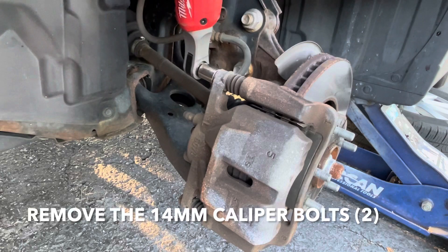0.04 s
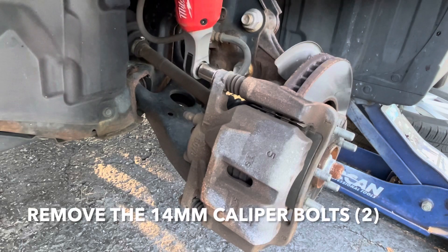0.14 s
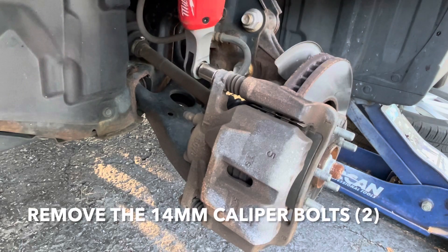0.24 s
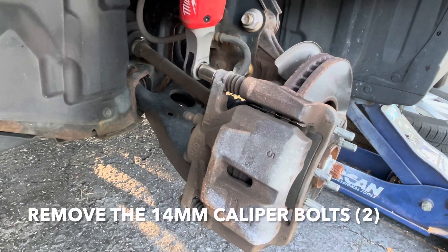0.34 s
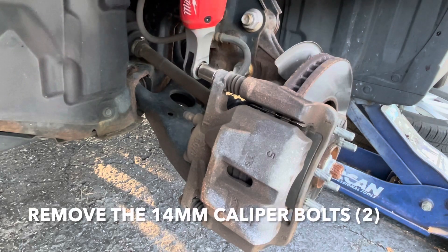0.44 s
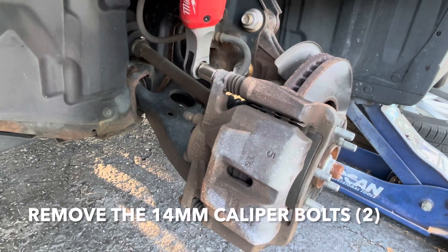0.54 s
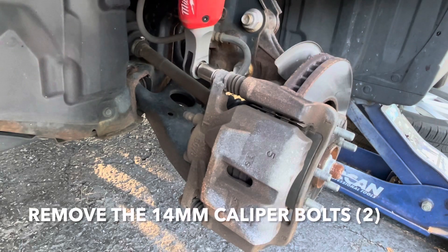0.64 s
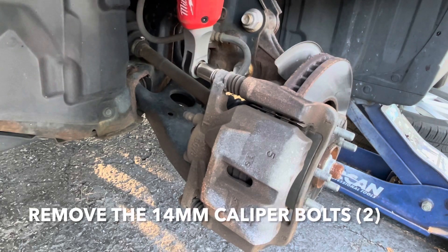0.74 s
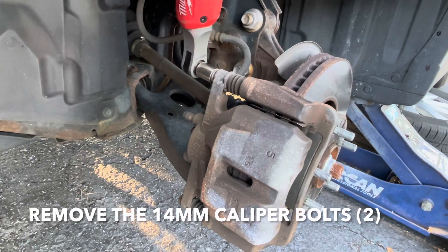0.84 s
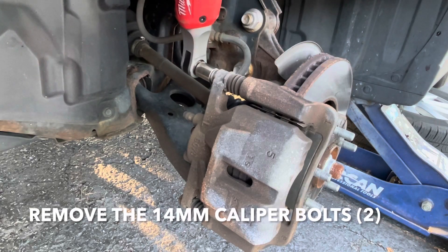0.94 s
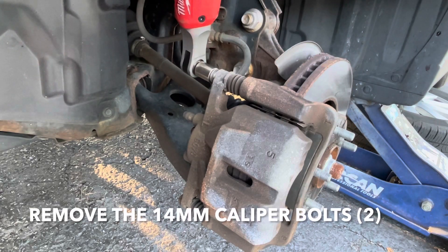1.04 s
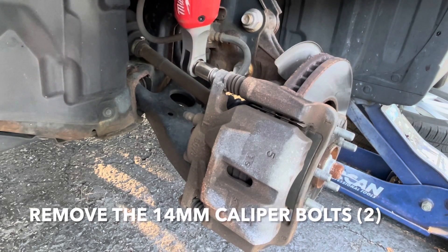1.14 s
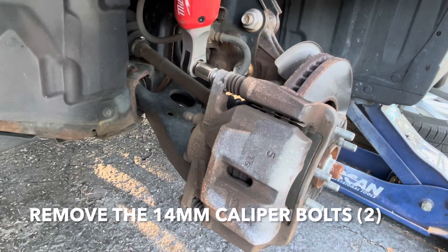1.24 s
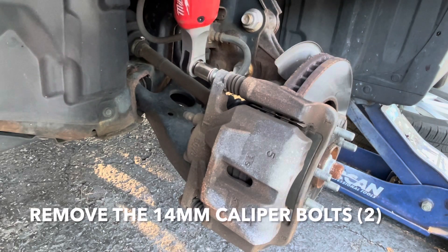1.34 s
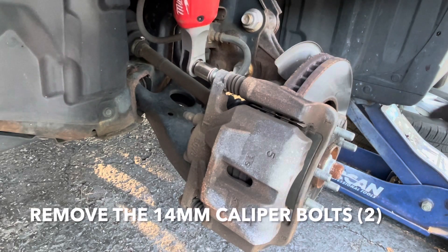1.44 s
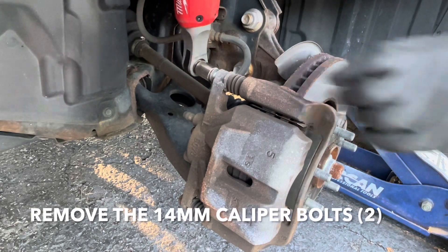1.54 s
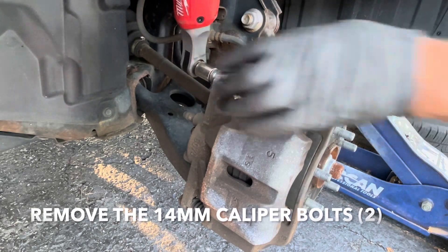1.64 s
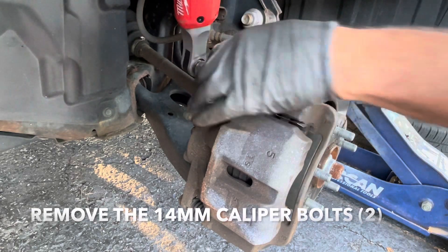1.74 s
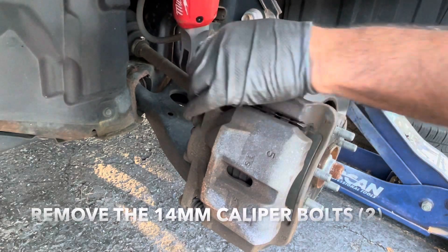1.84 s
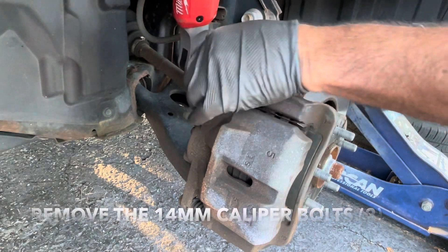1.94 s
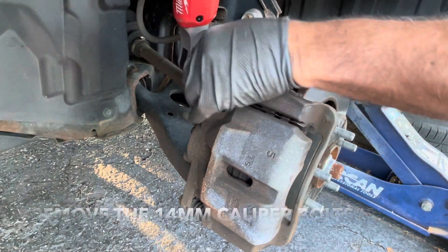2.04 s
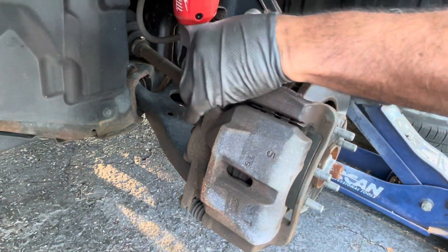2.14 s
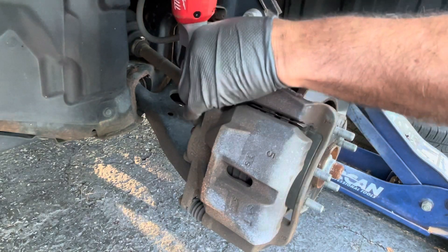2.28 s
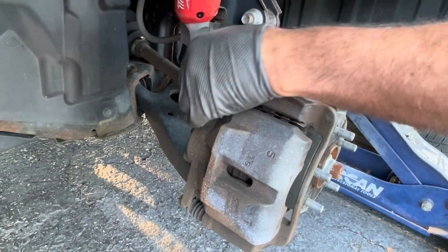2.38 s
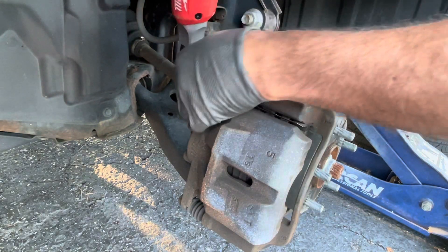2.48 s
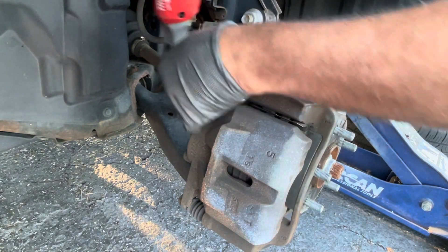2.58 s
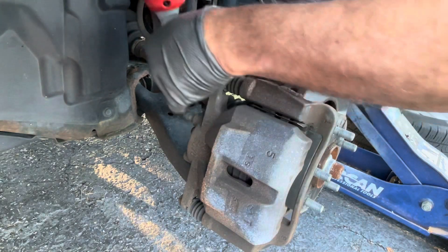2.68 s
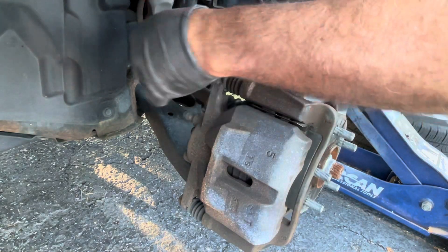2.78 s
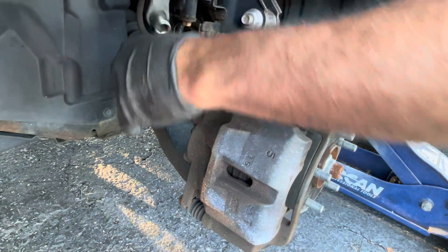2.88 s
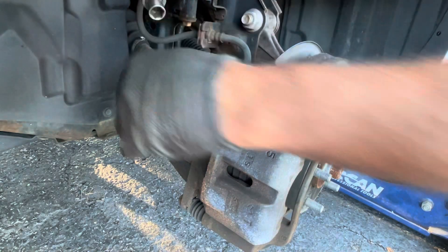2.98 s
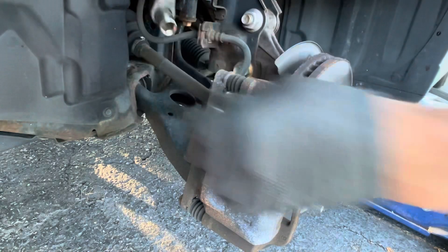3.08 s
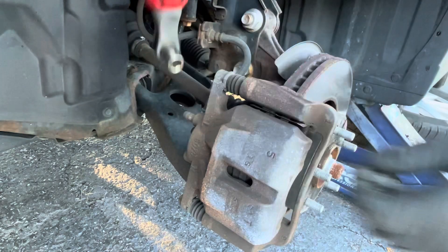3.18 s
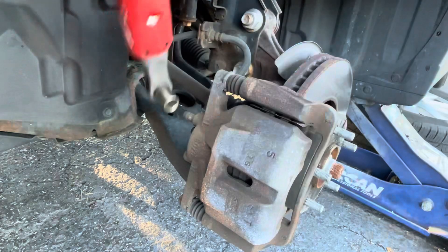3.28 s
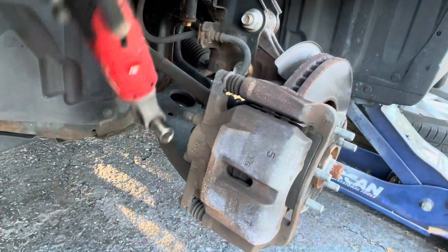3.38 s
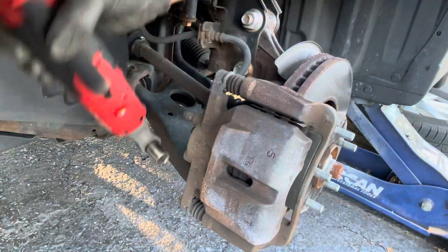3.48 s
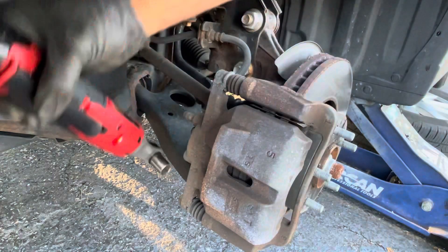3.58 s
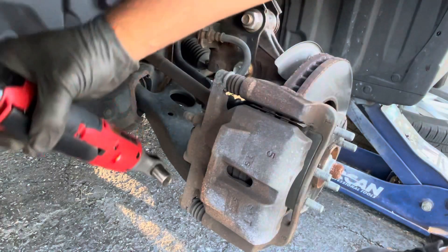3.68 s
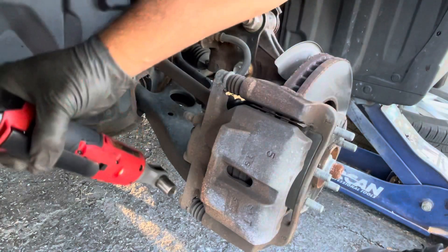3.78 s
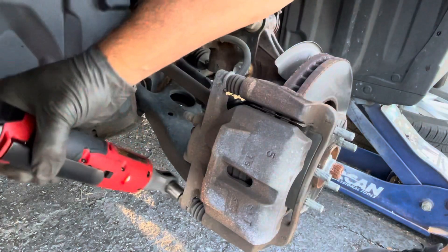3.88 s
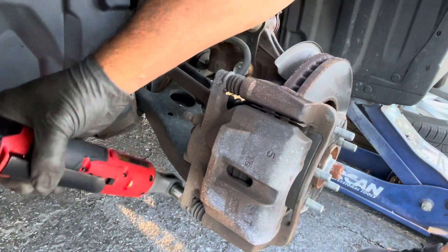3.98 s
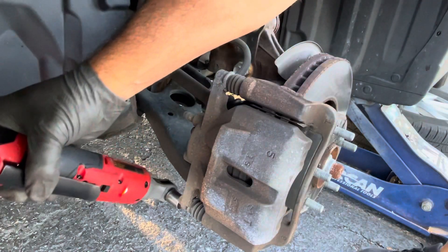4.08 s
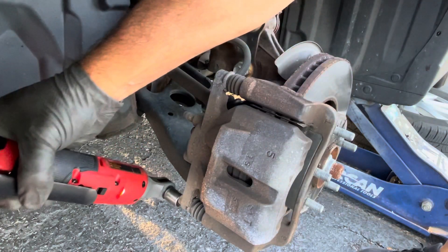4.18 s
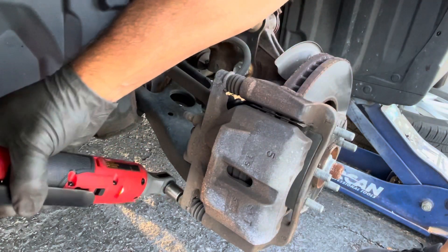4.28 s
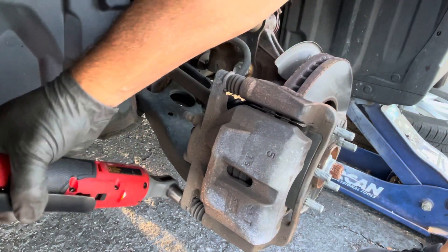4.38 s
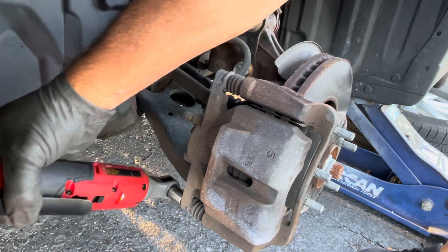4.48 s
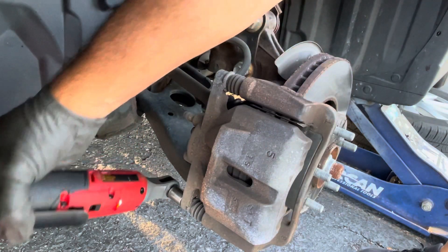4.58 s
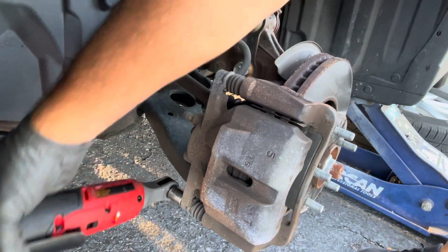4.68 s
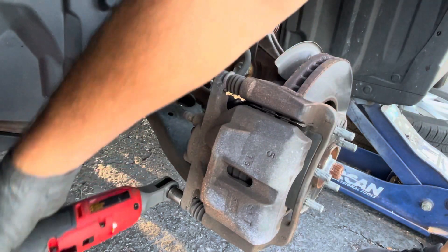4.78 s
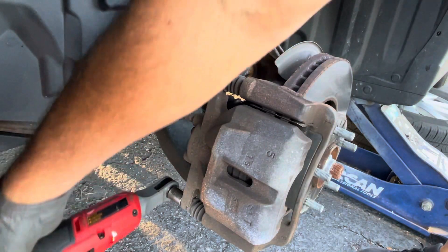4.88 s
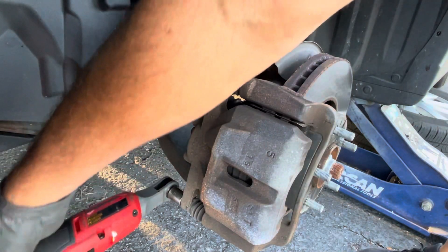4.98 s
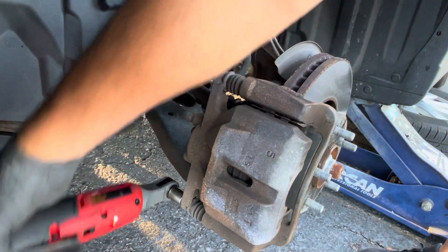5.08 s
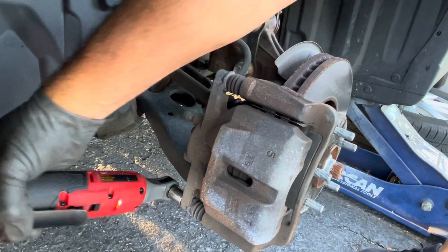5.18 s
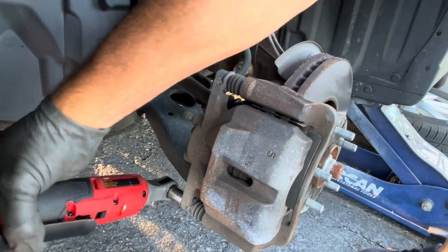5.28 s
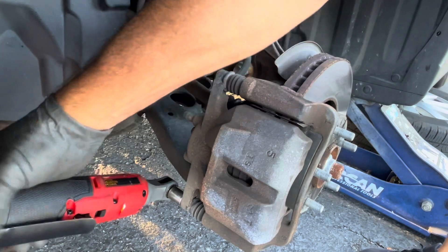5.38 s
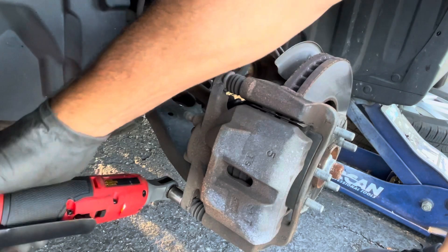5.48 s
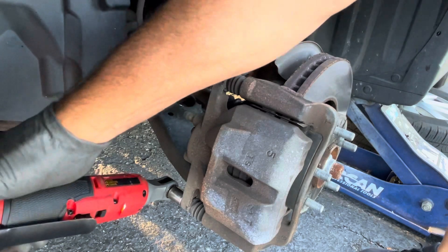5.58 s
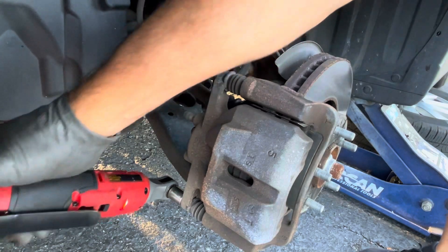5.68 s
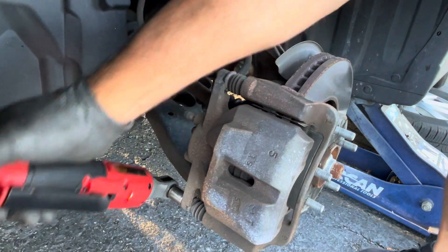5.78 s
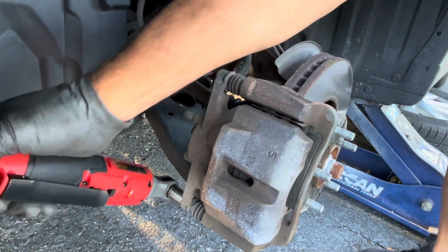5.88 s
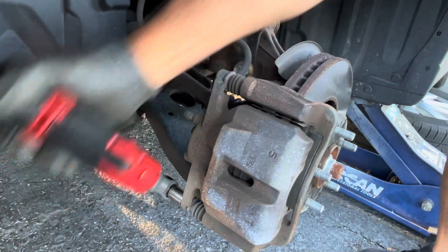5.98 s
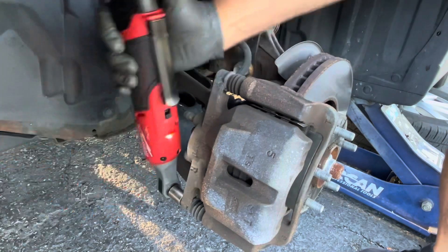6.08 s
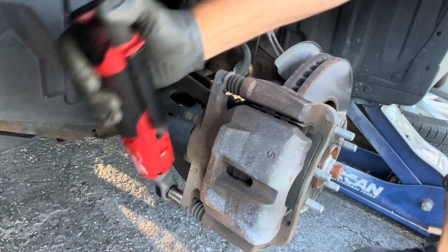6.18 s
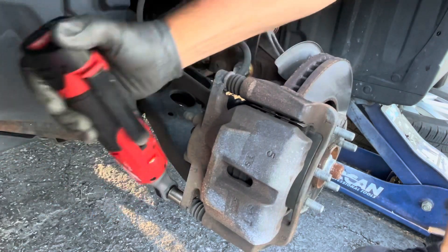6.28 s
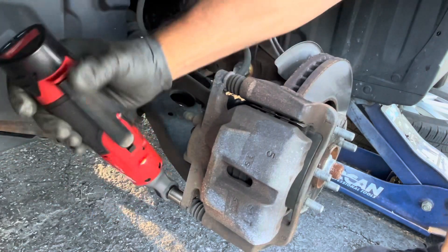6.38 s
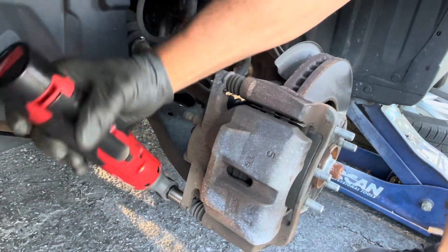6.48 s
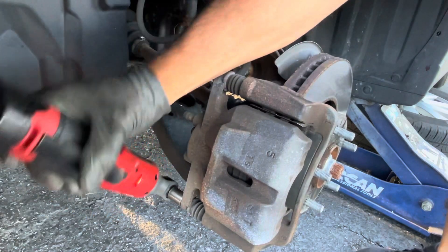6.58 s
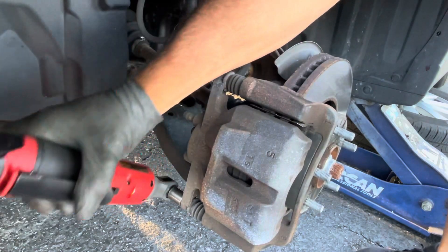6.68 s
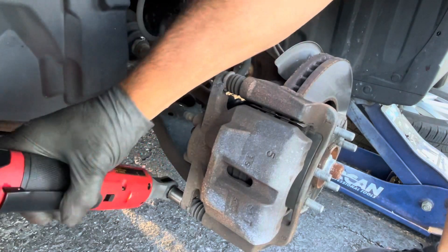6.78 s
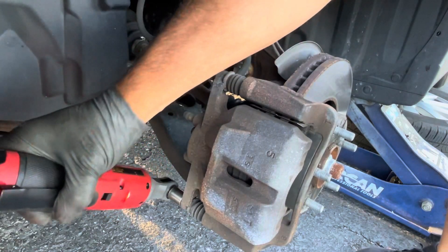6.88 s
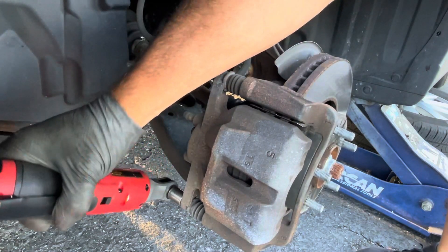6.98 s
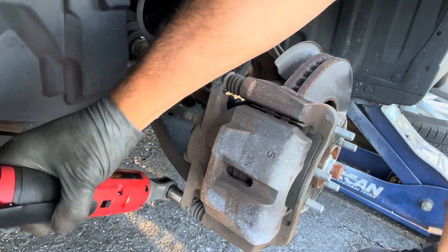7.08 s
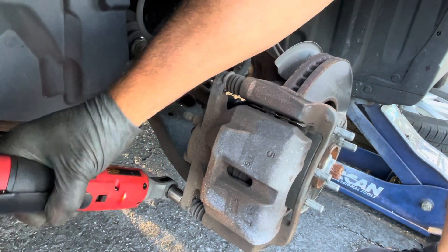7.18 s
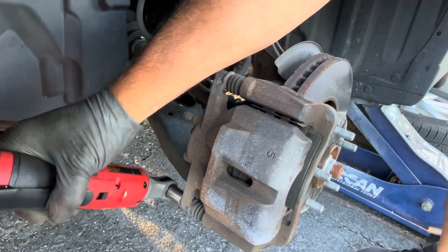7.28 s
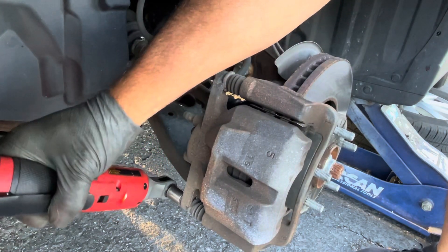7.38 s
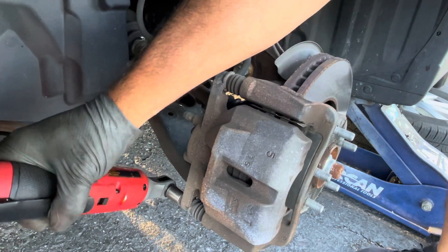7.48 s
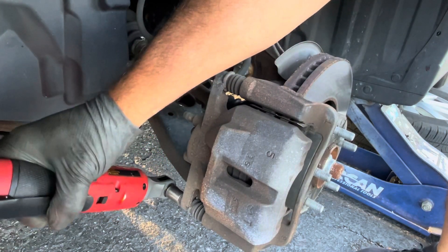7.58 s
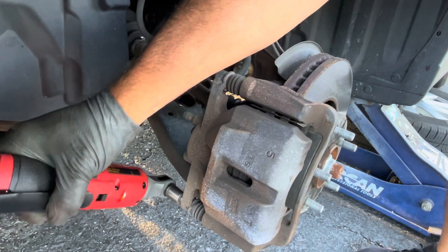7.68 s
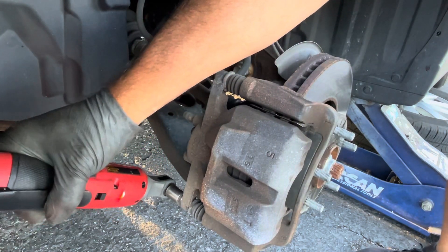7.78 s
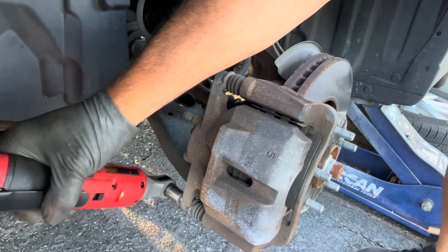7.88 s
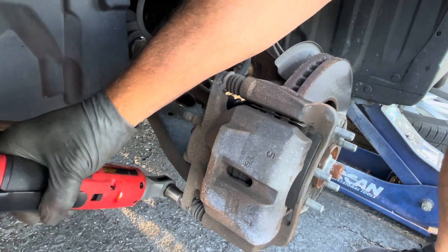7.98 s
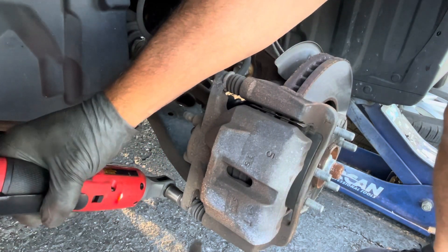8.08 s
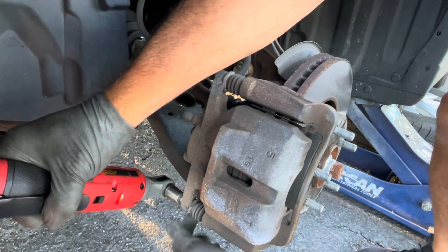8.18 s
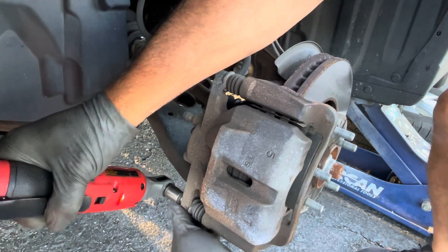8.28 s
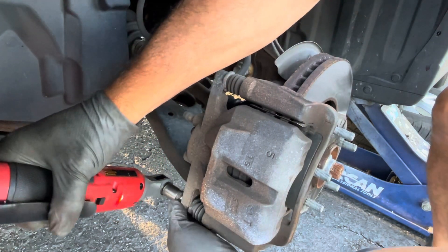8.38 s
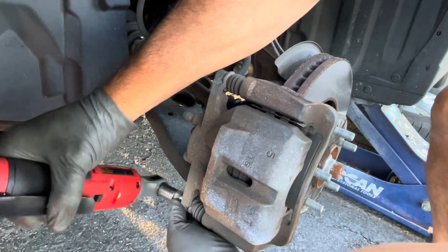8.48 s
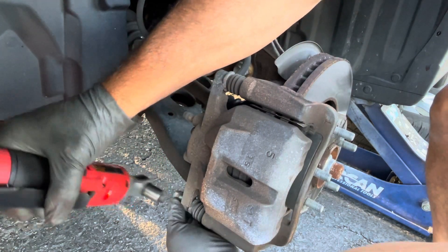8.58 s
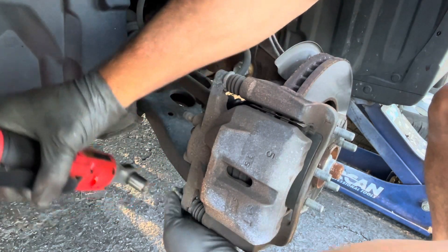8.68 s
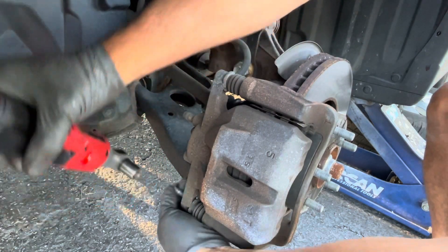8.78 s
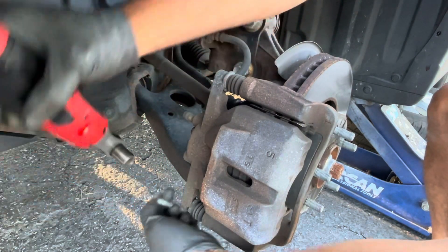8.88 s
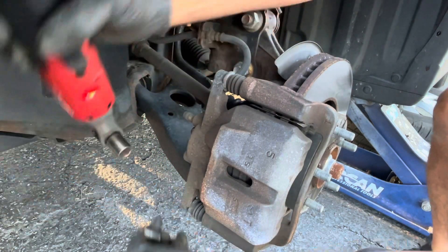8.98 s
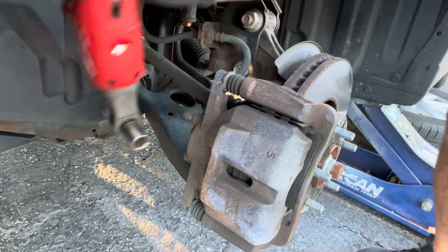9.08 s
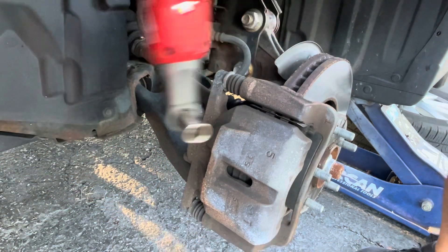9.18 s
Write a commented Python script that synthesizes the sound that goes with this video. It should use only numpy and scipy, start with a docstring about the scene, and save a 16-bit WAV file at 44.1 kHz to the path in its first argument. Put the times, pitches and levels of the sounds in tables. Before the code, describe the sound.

Close stereo pickup in a car's wheel well outdoors. Glove rustle and a sliding socket, one pawl click, then a cordless ratchet rattles for over a second, straining first, with the steel brake ringing on. Quiet handling follows: light knocks, scrapes, dull housing bumps and hand-turned ratchet clicks. A second, longer burst rattles and gradually weakens, with air puffs thumping the microphone and brief free whirring, then stops to tiny metallic ticks.

```python
"""A low outdoor rumble, a rustle of gloves and a sliding socket come first, then a click of the pawl.
A cordless ratchet spins two bolts out of a car's brake caliper, close to two microphone ports.
Its crank throws the pawl to and fro over rattling gears, the brake rings along, air puffs thump the ports.
Between the bursts the tool is moved, seated and clicked by hand: noise bursts through steel and echoes."""
import sys
import numpy as np
from scipy import signal
from scipy.fft import rfft, irfft, next_fast_len
from scipy.io import wavfile
from scipy.ndimage import uniform_filter1d

SR = 44100
rng = np.random.default_rng(int(sys.argv[2]) if len(sys.argv) > 2 else 0)


def generate_wav(signal):
    """Clip the signal to [-1, 1] and save it as 16-bit WAV at the path in sys.argv[1]."""
    frames = np.transpose(np.atleast_2d(signal))
    scaled = np.clip(frames, -1, 1) * 32767
    pcm = np.round(scaled).astype(np.int16)
    wavfile.write(sys.argv[1], SR, pcm)


N = 407484
T = np.arange(N) / SR


def undb(db):
    """Decibels to gain."""
    return 10 ** (np.asarray(db) / 20)


def unit(x):
    """Scale to rms 1."""
    return x / np.sqrt(np.mean(x ** 2))


def curves(rows):
    """The columns of a table of (s, values) at every sample."""
    s, *columns = np.transpose(rows)
    return [np.interp(T, s, c) for c in columns]


def add(out, s, sound):
    """Mix a sound in at a time."""
    i = int(s * SR)
    out[..., i:i + sound.shape[-1]] += sound[..., :N - i]


def fade(t, t60):
    """Exponential decay, 60 dB in t60 seconds."""
    return np.exp(-np.log(1000) * t / t60)


def during(start, end, edge_s=0.0035):
    """1 between two times, 0 outside, with short ramps."""
    return np.clip(np.minimum(T - start, end - T) / edge_s + .5, 0, 1)


def walk(rate_hz):
    """Smooth random wander, rms 1."""
    k = int(SR / rate_hz)
    steps = np.repeat(rng.standard_normal(N // k + 1), k)
    return unit(uniform_filter1d(steps, k)[:N])


def butter(x, hz, kind, order=2):
    """Low-pass or high-pass."""
    return signal.sosfilt(signal.butter(order, min(hz, SR / 2 - 1), kind, fs=SR, output="sos"), x)


def resonate(x, hz, width_hz):
    """One resonance, gain 1 at the centre."""
    return signal.lfilter(*signal.iirpeak(hz, hz / width_hz, fs=SR), x)


def resonate_twice(x, hz, width_hz):
    """Two equal resonances in series, for steeper skirts."""
    return resonate(resonate(x, hz, width_hz), hz, width_hz)


def band(hz, width_hz, size=N):
    """A narrow band of noise, different in each port."""
    return unit(resonate_twice(rng.standard_normal((2, size)), hz, width_hz))


def colour(x, points, size=4096):
    """Causal minimum-phase filter through (Hz, dB) points."""
    hz, db = np.transpose(points)
    bins_hz = np.fft.rfftfreq(size, 1 / SR)
    gain = undb(np.interp(np.log(bins_hz + 1), np.log(hz), db))
    cepstrum = irfft(np.log(gain))
    cepstrum[1:size // 2] *= 2
    cepstrum[size // 2 + 1:] = 0
    response = np.array(irfft(np.exp(rfft(cepstrum))), ndmin=x.ndim)
    return signal.oaconvolve(x, response, axes=-1)[..., :x.shape[-1]]


def delay(x, s):
    """Delay by any fraction of a sample."""
    size = next_fast_len(len(x))
    turn = np.exp(-2j * np.pi * np.fft.rfftfreq(size, 1 / SR) * s)
    return irfft(rfft(x, size) * turn, size)[:len(x)]


def linger(x, t60):
    """Amplitude of the energy that a sound leaves behind in a ringing part or a space."""
    keep = fade(1 / SR, t60) ** 2
    return np.sqrt(signal.lfilter([1 - keep], [1, -keep], x ** 2 + 1e-18))


def crack(t60, size=6000):
    """A short burst of contact noise."""
    return rng.standard_normal(size) * fade(np.arange(size) / SR, t60)


# Long waves arrive directly, shorter ones mostly by reflection. Each row: frequency in Hz, gain in dB.
DIRECT = [(100, -2), (400, -3), (900, -4.5), (6000, -5.5)]
REFLECTED = [(100, -12.5), (400, -7), (900, -1.5), (6000, -1.57)]
PORT_LAG_S = 0.0001704


def wheel_well(x, near_t60, far_t60, far_db, lead_s=.00018, split_hz=7000):
    """Direct sound, dense echoes and a longer tail at both ports; treble reaches the right port first."""
    tail = np.hypot(linger(x, near_t60), undb(far_db) * linger(x, far_t60))
    echo = tail * rng.standard_normal((3, len(x)))
    direct = colour(x, DIRECT)
    both = np.array([direct, delay(direct, lead_s)]) + colour(echo[:2], REFLECTED)
    low = butter(both, split_hz, "low", order=6)
    high = butter(undb(-4.0) * x + undb(-1.5) * echo[2], split_hz, "high", order=6)
    return low + np.array([delay(high, PORT_LAG_S), high])


RIPPLE_DB = 2.6


def steel(x, count=260):
    """Countless narrow resonances of the steel parts give the rattle a fine metallic ripple."""
    hz = np.geomspace(500, 11000, count)
    depth_db = RIPPLE_DB * np.interp(hz, [500, 900, 7000, 11000], [0, 1, 1, 0])
    ripple = rng.standard_normal(count)
    ripple = unit(ripple - uniform_filter1d(ripple, size=5))
    return colour(x, np.c_[hz, depth_db * ripple - depth_db ** 2 / 10])


# Background levels. Each row: time in seconds, rumble in dB, distant wash in dB (before a common trim).
BACKGROUND = [(0.15, -43.5, -53), (1.7, -73.5, -75.5), (2.7, -73.5, -74.5), (3.05, -61.5, -69),
              (4.1, -61.5, -72.5), (5.62, -61, -73), (5.72, -57, -70.5), (6.2, -54.5, -66),
              (6.8, -54.5, -65), (8.5, -78.5, -85.5), (9.24, -73.5, -83)]
# Glove grip shifts. Each row: start in seconds, length in seconds, level in dB.
GRIPS = [(-.1, 0.34, -60), (2.264, 0.35, -79.5), (3.016, 0.78, -89), (4.568, 0.22, -81), (5.263, 0.24, -80),
         (6.203, 0.42, -66), (8.63, .21, -81)]
# Noise colours. Each row: frequency in Hz, gain in dB.
RUMBLE = [(20, -26.5), (40, -5), (65, 5), (120, 1.5), (210, -6.5), (320, -12.5), (600, -28.5),
          (1500, -55.5)]
WASH = [(150, -9.5), (450, -1.5), (800, 1.5), (1100, -1.5), (1700, -8), (3000, -21), (8000, -41)]
RUSTLE = [(600, -15), (2300, 1), (3600, -1.5), (4500, 0), (5500, -0.5), (8000, -12), (11000, -0.5),
          (16000, -12)]
RUSTLE_REST_DB = -86.5  # the hand at rest


def surroundings():
    """Distant rumble nearly alike in both ports, a wider wash above it, and the grainy rustle of gloves."""
    rumble_db, wash_db = curves(BACKGROUND)
    grip = undb(RUSTLE_REST_DB)
    for s, length_s, db in GRIPS:
        grip = grip + undb(db) * np.sin(np.pi * np.clip((T - s) / length_s, 0, 1))

    def noise(points, width):
        """Stereo noise with a given share of side."""
        mid, side = (unit(colour(rng.standard_normal(N), points)) for _ in range(2))
        return np.array([mid + width * side, mid - width * side])

    steady = undb(rumble_db) * noise(RUMBLE, .12) + undb(wash_db + 0.5) * noise(WASH, 0.59)
    rustle = grip * undb(2.0 * walk(49)) * noise(RUSTLE, .9)
    return steady * undb(np.array([[1], [-1]]) * 0.34) + rustle


DRONE_DB, DRONE_FADE_START_S, DRONE_FADE_DB_PER_S = -72, 1.8, 2.5  # a far engine, moving off


def drone():
    """A narrow, wavering band of far engine noise."""
    level_db = DRONE_DB - DRONE_FADE_DB_PER_S * np.maximum(T - DRONE_FADE_START_S, 0)
    return undb(level_db) * unit(resonate_twice(rng.standard_normal(N), 210, 70))


# The socket slides on the bolt and along the bracket.
# Each row: start in seconds, length in seconds, level in dB, pitch in Hz, width in Hz.
SLIDES = [(0, .21, -57.5, 2410, 200), (.01, .14, -56, 10600, 900), (3.04, .065, -64.5, 2920, 220),
          (3.1, .45, -79, 4440, 450), (3.2, 0.23, -84, 11200, 1800), (8.595, 0.12, -70.5, 5000, 1300)]


def slides():
    """Light sliding contact makes one resonance of the steel sing roughly."""
    out = np.zeros((2, N))
    for s, length_s, db, hz, width_hz in SLIDES:
        size = int(length_s * SR)
        add(out, s, undb(db) * band(hz, width_hz, size=size) * np.sqrt(np.hanning(size)))
    return out


# Pawl clicks as the handle is swung by hand. Each row: time in seconds, level in dB.
CLICKS = [(0.154, -16.5), (2.592, -37), (2.882, -55), (3.561, -40.5), (4.702, -33.5), (4.769, -35),
          (4.842, -31.5), (5.462, -53), (6.476, -24), (6.552, -23), (6.616, -21.5), (6.737, -32.5),
          (6.75, -23), (8.502, -45.5)]
# Each row: frequency in Hz, gain in dB.
CLICK_COLOUR = [(200, -19), (800, -7), (1600, -8.5), (2800, -3), (5500, -2.5), (8000, -5), (12000, 1),
                (16000, -4)]


def hand_clicks():
    """The pawl drops over single teeth: short noise cracks through steel and echoes."""
    out = np.zeros(N)
    for s, db in CLICKS:
        add(out, s - .001, undb(db) * crack(0.0047))
    heard = wheel_well(out, near_t60=0.036, far_t60=.18, far_db=-16)
    return undb(3.0) * colour(steel(heard), CLICK_COLOUR)


# Ring of disc and caliper.
# Each row: pitch in Hz, t60 in seconds, dB from the upper bolt, dB from the lower bolt.
BRAKE = [(1136, .8, -47, -60), (1405, .69, -49.5, -59), (1800, 0.71, -37, -53), (2067, 0.98, -51.5, -43),
         (2220, .4, -46, -52), (3752, .6, -53, -59.5), (4538, .3, -52, -46), (4802, .45, -56, -50.5),
         (6772, .42, -53, -43.5)]
TOOL_MOVES_S = 3.3  # from upper to lower bolt


def brake_ring(x):
    """Every blow travels through the bolt into the disc; each bolt favours other modes."""
    out = 0
    for hz, t60, upper_db, lower_db in BRAKE:
        fed = x[0] * np.where(T < TOOL_MOVES_S, undb(upper_db), undb(lower_db))
        out = out + linger(fed, t60) * np.sin(2 * np.pi * hz * T + .45 * walk(9))
    return out


SOCKET_HZ, SOCKET_WIDTH_HZ, SOCKET_T60_S, SOCKET_DB = 4370, 370, 0.35, -21.5


def socket_ring(x):
    """The loose socket rings on after each contact."""
    return undb(SOCKET_DB) * linger(x[0], SOCKET_T60_S) * band(SOCKET_HZ, SOCKET_WIDTH_HZ)


CRANK_HZ = 130.7  # turns per second with no load
BRAKING_S = .02  # time constant of the motor brake


def motor(start, release, spin_up_s):
    """Share of full speed: the motor spins up on the trigger and brakes on release."""
    spin_up = 1 - np.exp(-np.maximum(T - start, 0) / spin_up_s)
    return spin_up * np.exp(-np.clip((T - release) / BRAKING_S, 0, 20))


BREAKAWAY_S, BREAKAWAY_DB, BREAKAWAY_EASE_DB_PER_S = .218, 8, 30  # the first turns fight the rust
LOOSE_DB, LOOSE_SAG_DB_PER_S = -2.5, 4  # a loose bolt rattles less and less


def load(start, loose):
    """Load in dB: highest at breakaway, steady along the thread, fading once the bolt is loose."""
    easing_db = BREAKAWAY_DB - BREAKAWAY_EASE_DB_PER_S * np.maximum(T - start, 0)
    breakaway = during(0, start + BREAKAWAY_S) * easing_db
    return breakaway + during(loose, np.inf) * (LOOSE_DB - LOOSE_SAG_DB_PER_S * (T - loose))


LOUDNESS_POWER = 1.8  # the rattle grows with this power of the speed
SLOW_TREBLE_DB, TREBLE_DB_PER_LOAD_DB = -10.5, -0.1  # treble at standstill, treble per dB of load


def effort(pace, load_db):
    """Gain and treble dB of the rattle: louder with speed and load, dull when slow."""
    gain = pace ** LOUDNESS_POWER * undb(load_db)
    return gain, SLOW_TREBLE_DB * (1 - pace) + TREBLE_DB_PER_LOAD_DB * load_db


def pawl(turns, at, jitter, scatter_db):
    """One blow at a given part of every crank turn, each a little off in time and strength."""
    count = np.arange(int(turns[-1]))
    early, strength = rng.standard_normal((len(count), 2)).T
    blows = np.zeros(N)
    samples = np.searchsorted(turns, count + at + jitter * early)
    blows[np.minimum(samples, N - 1)] = undb(scatter_db * strength)
    return unit(blows)


def mechanism(speed, turns):
    """The pawl drives, then skips back; each blow sprays tiny impacts, while gears hiss more evenly."""
    drive = pawl(turns, 0, jitter=.025, scatter_db=1.5)
    skip = pawl(turns, .26, jitter=.04, scatter_db=2)
    blows = drive + undb(-6) * skip
    chatter = unit(signal.fftconvolve(blows, fade(T[:2000], .014))[:N])
    impacts = undb(-12.5) * unit(blows) + 1.1 * chatter * rng.standard_normal(N)
    grains = rng.standard_normal(N) * (rng.random(N) < .4)
    gears = unit(grains) * undb(1.6 * walk(600))
    clatter = colour(impacts, [(5000, 0), (11000, -2)]) + colour(gears, [(5000, -1), (11000, 3)])
    return clatter / np.std(clatter[speed > CRANK_HZ / 2]) * undb(0.46 * walk(25))


# One trigger pull per bolt. Each row: start in seconds, bolt loose in seconds, release in seconds,
# spin-up time constant in seconds, share of speed lost at 0 dB load, level in dB, relative shudder in dB.
RUNS = [(0.204, 0.859, 1.498, .031, .048, -18, -12.5), (6.8, 7.42, 8.374, .046, .03, -18.5, -20.5)]
# Rattle colour. Each row: frequency in Hz, dB on the upper bolt, dB on the lower bolt.
RATTLE = [(60, -18, -14.5), (300, -13, -11), (610, -12, -12), (910, -6.5, -8), (1200, -7.5, -5),
          (1560, -5, -5), (2090, 0.5, 0), (3180, 0, -1), (3930, 0.5, 4), (4970, 0, 2), (6840, 1, 1.5),
          (8400, -10.5, -1), (9000, 0, 3), (13700, 1, 0.5), (15500, -14.5, -17.5)]
# Tool and socket resonances on each bolt. Each row: pitch in Hz, width in Hz, relative level in dB.
UPPER_PEAKS = [(463, 15, 4.5), (770, 30, -1), (960, 48, -0.5), (1400, 30, 4), (1472.4, 40, 2.5),
               (1670, 37, -2.5), (2100, 80, -4), (2336, 32, -4.5), (2780, 120, 0.5), (3680, 270, -3),
               (4300, 53, -4), (6160, 130, -3), (6850, 150, -5.5)]
LOWER_PEAKS = [(467, 13, 7), (775, 20, 9), (907, 23.9, 7), (956, 24, -0.5), (1410, 18, 1), (1805, 120, 3),
               (2010, 90, -1.5), (3650, 270, -4), (4296, 250, -3), (4950, 90, -10.5), (6360, 60, -4),
               (6820, 130, -8.5)]
# Crank hum. Each row: multiple of crank speed, relative level in dB.
HUM = [(1, -30), (2, -35.5), (3, -32), (4, -29.5), (5, -33.5), (6, -28), (7, -31)]
# The socket spins freely. Each row: start in seconds, end in seconds.
FREE_SPINS = [(8.15, 8.277), (8.329, 8.373)]
# Whirr of the free socket. Each row: frequency in Hz, gain in dB.
FREE_COLOUR = [(100, -14), (300, -25.5), (600, -22.5), (950, -6), (1450, -13.5), (1750, 0.5), (4400, 3),
               (7000, 4.5), (9700, 3), (11000, -12), (12000, -20.5), (15500, -21)]
FREE_DB = -29.5
SHUDDER_AT, SHUDDER_SPREAD = 2.4, .9  # in spin-up time constants


def ratchet():
    """Two motor runs: rattle through tool resonances, crank hum, a starting shudder, a free whirr."""
    speed, torque, efforts = 0, 0, []
    for start, loose, release, spin_up_s, droop, level_db, shudder_db in RUNS:
        pace, load_db = motor(start, release, spin_up_s), load(start, loose)
        speed = speed + CRANK_HZ * pace * (1 - droop * undb(load_db) ** 2)
        off_peak = ((T - start) / spin_up_s - SHUDDER_AT) / SHUDDER_SPREAD
        torque = torque + np.exp(-np.minimum(off_peak ** 2 / 2, 20))
        efforts.append((level_db, shudder_db, *effort(pace, load_db)))
    turns = np.cumsum(speed * (1 + .005 * walk(12))) / SR
    blows = mechanism(speed, turns)
    free = sum(during(*spin) for spin in FREE_SPINS)
    hum = sum(undb(db) * np.sqrt(2) * np.sin(2 * np.pi * multiple * turns) for multiple, db in HUM)
    whirr = wheel_well(blows * free, near_t60=0.024, far_t60=0.36, far_db=-19.5)
    out = undb(FREE_DB) * colour(whirr, FREE_COLOUR)
    for bolt, peaks in enumerate((UPPER_PEAKS, LOWER_PEAKS)):
        level_db, shudder_db, gain, treble_db = efforts[bolt]
        gain = gain * (1 - free)
        drive = steel(wheel_well(blows * gain, near_t60=.025, far_t60=.6, far_db=-35))
        body = sum(undb(db) * resonate(drive, hz, width_hz) for hz, width_hz, db in peaks)
        bolt_colour = np.array(RATTLE)[:, [0, bolt + 1]]
        rattle = undb(0.92) * colour(drive + undb(-3.0) * body, bolt_colour)
        # treble follows speed and load
        sizzle = rattle - uniform_filter1d(rattle, 5)
        rattle = rattle + sizzle * (undb(np.clip(treble_db, -16, 2)) - 1)
        shudder = undb(shudder_db) * torque * band(940, 280)
        out = out + undb(level_db) * (rattle + gain * (undb(-14) * hum + shudder))
    return out


# Dull bumps of the tool: thuds in the hand, and kicks of the motor as it starts and stops. Each row: time in
# seconds, level in dB, pitch in Hz, t60 in seconds.
BUMPS = [(1.203, -26, 950, 0.046), (1.504, -21.5, 900, 0.035), (2.68, -50, 980, 0.072),
         (2.765, -47.5, 980, 0.1), (2.985, -39, 326, 0.32), (3.058, -44, 219, 0.069),
         (3.061, -35.5, 1040, 0.028), (4.39, -41.5, 273, 0.14), (4.68, -49, 443, 0.69),
         (5.29, -36.5, 960, 0.018), (5.701, -38, 420, 0.49), (5.745, -33.5, 277, 0.15),
         (5.975, -32, 816, 0.15), (6.045, -39, 840, 0.074), (6.122, -41, 850, 0.24), (6.82, -27, 290, 1),
         (6.859, -33, 115, 0.47), (8.379, -29, 1000, 0.038)]


def bumps():
    """The plastic housing thuds, in the gloved hand or kicked by the motor: decaying noise through a broad
    resonance."""
    out = np.zeros((2, N))
    for s, db, hz, t60 in BUMPS:
        push = wheel_well(crack(t60, size=12000), near_t60=0.037, far_t60=.4, far_db=-26)
        thud = resonate_twice(push, hz, 0.47 * hz)
        add(out, s, undb(db - 6.5) * thud / np.abs(thud).max())
    return out


# Air puffs on the ports, each a falling thump.
# Each row: time in seconds, level in dB, starting pitch in Hz, exponent of level against pitch.
PUFFS = [(1.2775, -9, 1100, -0.17), (1.371, -22, 750, .5), (7.329, -29.5, 510, 0.31),
         (7.414, -17, 682, 0.46), (7.546, -22, 650, 0.26), (7.7318, -21, 910, .4), (7.755, -35, 997, 0.95),
         (7.777, -36, 900, 0.87), (7.801, -22.5, 1200, 0.61), (7.818, -26.5, 900, 0.81),
         (7.847, -30.5, 1207, 0.76), (7.870, -19.5, 2000, 0.88), (7.902, -20, 2200, 0.83),
         (7.933, -28, 1400, 0.44), (7.9865, -14.5, 2420, 0.66), (8.071, -36, 1400, 0.72),
         (8.102, -26, 1686, .7), (8.111, -32, 900, 0.7), (8.1495, -15, 900, 0.8), (8.278, -41, 1300, 0.3),
         (8.326, -16.5, 900, 0.8)]


def puffs(cycles=1.4, typical_hz=800, lowest_hz=50, wake_db=-29, wake_t60=0.84,
          right_db=-4, right_lag_rad=0.9, size=22000):
    """Each puff spreads: its period grows steadily, slow eddies trail; the right is weaker and later."""
    left, right, t = np.zeros(N), np.zeros(N), T[:size]
    for s, db, start_hz, slope in PUFFS:
        stretch = (start_hz / typical_hz) ** 0.33  # sharp puffs fall faster
        hz = 1 / (1 / start_hz + t / cycles * stretch)
        phase = 2 * np.pi * np.cumsum(hz) / SR
        swell = np.sin(np.minimum(phase / 3, np.pi / 2)) ** 2
        bass_cut = np.exp(-(lowest_hz * (1 + 0.46 * slope) / hz) ** 2)
        shape = swell * (hz / start_hz) ** slope * bass_cut
        shape = shape / shape.max()
        eddies = unit(resonate_twice(rng.standard_normal(size), 58, 60))
        wake_gain = undb(wake_db) * (lowest_hz / start_hz) ** max(slope, 0)
        wake = wake_gain * swell * fade(t, wake_t60) * eddies
        add(left, s, undb(db) * (shape * np.sin(phase) + wake))
        add(right, s, undb(db + right_db) * (shape * np.sin(phase - right_lag_rad) + wake))
    return np.array([left, butter(right, 1000, "low", order=1)])


# Socket and glove scrape over metal.
# Each row: start in seconds, length in seconds, level in dB, relative treble in dB.
SCRAPES = [(2.522, 0.033, -52.5, 7.5), (2.663, 0.054, -60, -19.5), (2.739, 0.046, -59.5, -5),
           (2.975, .05, -63, 3), (3.024, .09, -57.5, -20), (3.088, 0.23, -64.5, -17.5),
           (4.204, 0.095, -61, -32), (4.337, 0.068, -56.5, -26), (5.686, 0.15, -62, -12),
           (5.96, 0.094, -45.5, -6), (6.102, 0.073, -53, -25), (8.437, 0.019, -58, -16),
           (9.209, 0.0287, -64, -13)]
# Parts rung by scrapes and knocks. Each row: frequency in Hz, gain in dB.
KNOCK_COLOUR = [(100, -24.5), (300, -5), (550, -4), (950, 4), (1400, -1.5), (2200, 2), (4700, -2.5),
                (7000, -4), (12000, -10.5), (16000, -33)]


def scrapes():
    """Dense uneven slips over rusty steel, ringing the same parts as the knocks."""
    out = np.zeros((2, N))
    for s, length_s, db, treble_db in SCRAPES:
        size = int(length_s * SR)
        unevenness = undb(5.0 * walk(274.0)[:size])
        slips = rng.standard_normal(size) * unevenness * np.sqrt(np.hanning(size))
        padded = np.pad(unit(slips), (0, SR // 4))
        heard = wheel_well(padded, near_t60=0.064, far_t60=.35, far_db=-16)
        add(out, s, undb(db) * colour(heard, [(3000, 0), (9000, treble_db + 0.5)]))
    return colour(out, KNOCK_COLOUR)


# Socket and housing knock on metal.
# Each row: time in seconds, level in dB, low body setting in dB, treble setting in dB (both rescaled).
KNOCKS = [(2.533, -37.5, -39, -12), (3.668, -51.5, -5, -30), (3.902, -29.5, -12.5, -21),
          (4.267, -50, -5, -57.5), (4.382, -41.5, -6, -26), (4.514, -50.5, -5, -39.5),
          (4.879, -50, -20, -25), (5.091, -50, -18, -12), (5.103, -32, -23, -18), (5.148, -30, -24, -11.5),
          (5.174, -51, -18, -13), (5.288, -51.5, -6, -22), (5.698, -24.5, -9.5, -33),
          (5.744, -33.5, -5, -39), (5.766, -46, 3.5, -36), (5.966, -41.5, -6, -37), (5.978, -36, -4, -38),
          (6.043, -28.5, -6, -16), (6.121, -45, -4, -15), (6.788, -33.5, -6, -19), (8.588, -52, -24, -10),
          (8.616, -50.5, -24, -13), (8.676, -55, -30, -12), (8.695, -56, -29, -14)]


def knocks():
    """Metal meets metal; soft contacts are dull, hard ones bright."""
    out = np.zeros((2, N))
    for s, db, low_db, treble_db in KNOCKS:
        low_gain_db = 0.76 * (min(low_db, -6) + 12.5)
        treble_gain_db = 0.88 * (treble_db + 13.5)
        hardness = [(700, low_gain_db), (2200, 0.0028), (4500, 0.0006), (9000, treble_gain_db)]
        blow = wheel_well(crack(0.0091, size=16000), near_t60=0.035, far_t60=.25, far_db=-14)
        add(out, s - .0005, undb(db) * colour(blow, hardness))
    return undb(4.5) * colour(steel(out), KNOCK_COLOUR)


# Sharp pops of two puffs, head on to the left port. Each row: time in seconds, level in dB, pitch in Hz.
POPS = [(8.149, -2, 1800), (8.3255, -2.5, 1830)]


def pops(cycles=0.56, right_db=-15, size=400):
    """A pressure snap of about one cycle, weaker at the right port."""
    out, t = np.zeros(N), T[:size] - T[size // 2]
    for s, db, hz in POPS:
        snap = np.exp(-(t * hz / cycles) ** 2) * np.cos(2 * np.pi * hz * t)
        add(out, s + t[0], undb(db) * snap)
    return np.array([out, undb(right_db) * out])


# The tool works on the left. Each row: frequency in Hz, left over right in dB.
LEFT_BIAS = [(100, 3), (700, 6.5), (1700, 4), (2100, 1.5), (2800, 1.5), (5000, 4), (7500, 2), (9000, -0.5)]


def scene():
    """Tool and contacts sound in the wheel well, mostly to the left; puffs act on the ports alone."""
    contacts = hand_clicks() + knocks() + scrapes()
    metal = ratchet() + contacts
    work = metal + brake_ring(metal) + socket_ring(contacts) + slides() + bumps()
    heard = []
    for port, side in zip(work, (1, -1)):
        heard.append(colour(port, [(hz, side * db / 2) for hz, db in LEFT_BIAS]))
    return np.array(heard) + puffs() + pops() + surroundings() + drone()


TOP_HZ = 15750


def record(dry):
    """The microphones round the highest peaks and cut the deepest bass and the top."""
    rounded = dry / (1 + (dry / .9) ** 6) ** (1 / 6)
    top_cut = signal.ellip(10, .2, 80, TOP_HZ, fs=SR, output="sos")
    return signal.sosfilt(top_cut, butter(rounded, 33, "high", order=4))


dry = scene()
out = record(dry)
generate_wav(out)
```